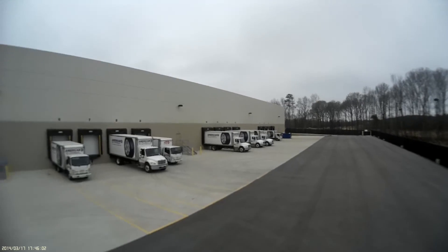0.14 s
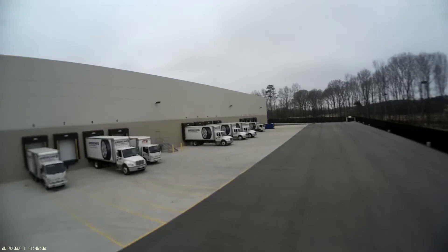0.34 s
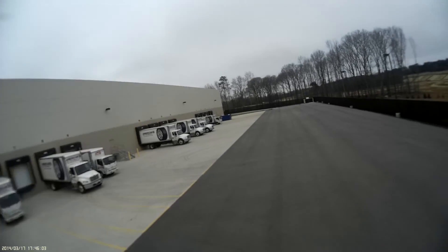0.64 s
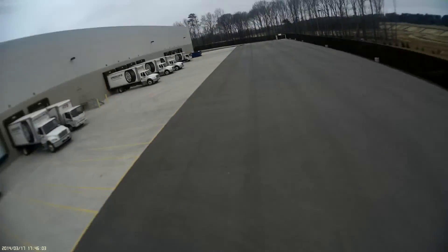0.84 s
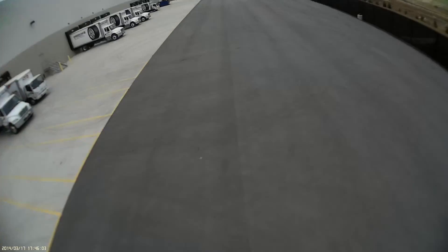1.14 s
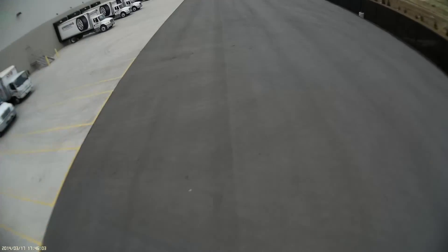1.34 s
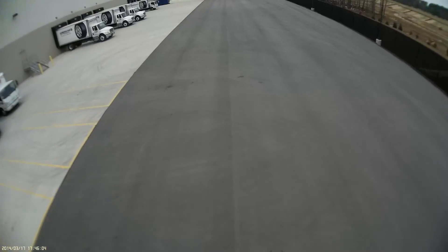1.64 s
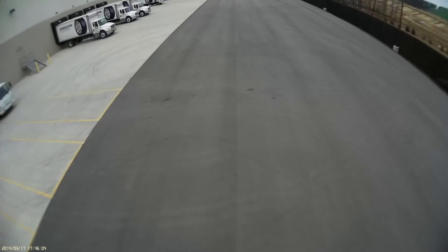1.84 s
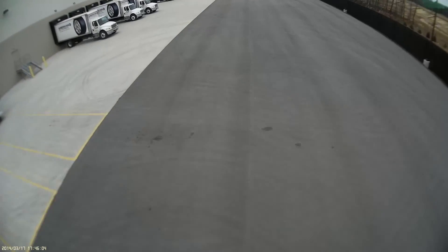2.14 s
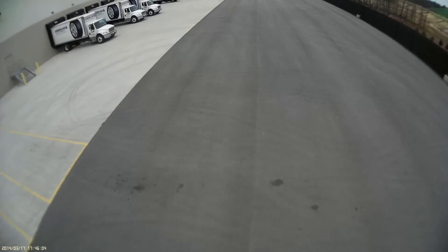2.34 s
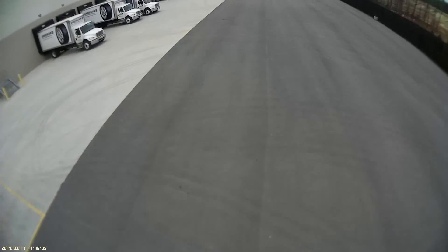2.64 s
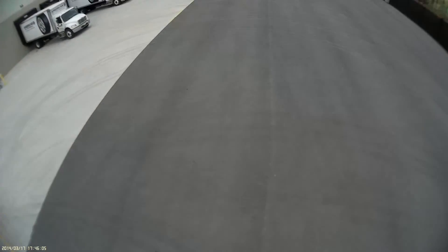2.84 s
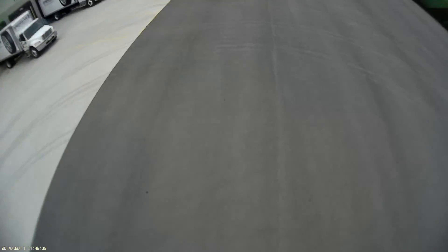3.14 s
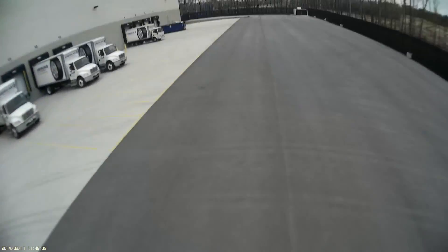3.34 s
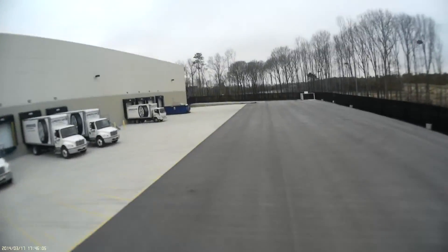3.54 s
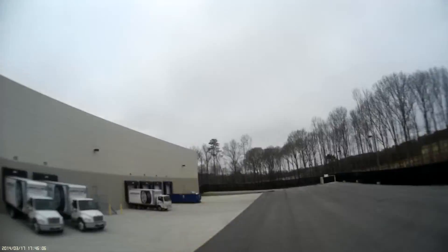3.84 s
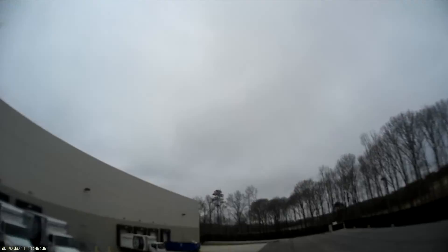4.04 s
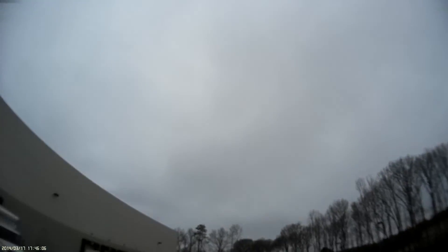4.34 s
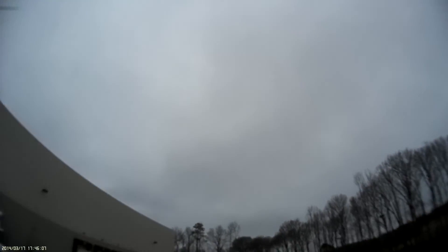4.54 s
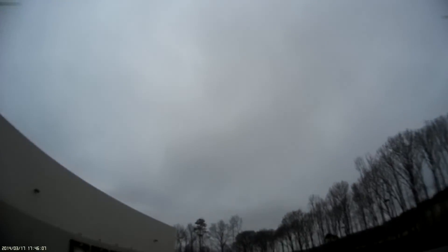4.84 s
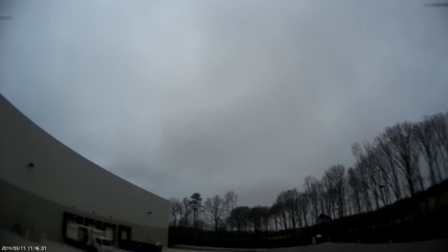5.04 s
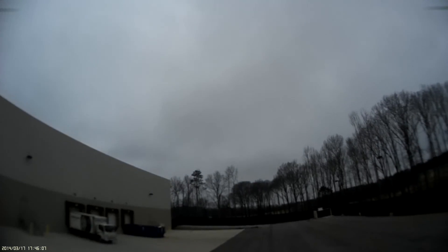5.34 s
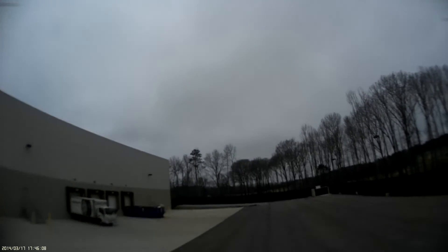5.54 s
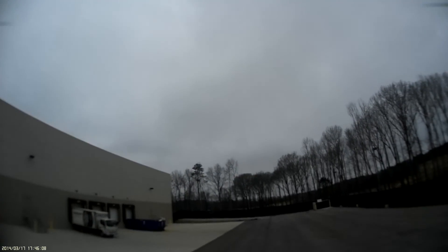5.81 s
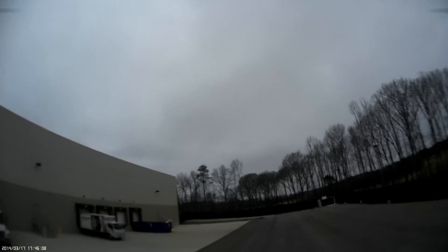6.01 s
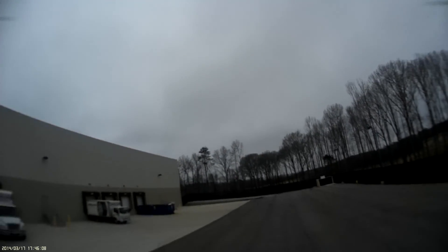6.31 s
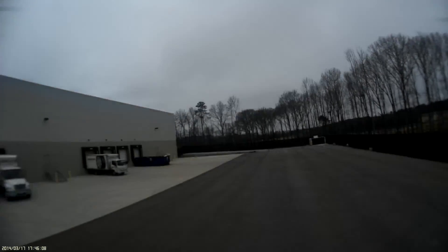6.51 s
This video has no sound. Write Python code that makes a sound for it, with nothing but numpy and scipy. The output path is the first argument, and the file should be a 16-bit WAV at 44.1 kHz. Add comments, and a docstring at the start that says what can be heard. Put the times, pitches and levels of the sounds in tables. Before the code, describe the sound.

Onboard a small drone, a harsh throbbing propeller drone rises, drops suddenly with a rough squawk, then climbs again through roaring wind and hiss.

```python
"""Propellers of a small four-rotor drone in flight, heard by a microphone on its body.
Two near propellers sound harmonic blade tones and beat against each other; a farther one is fainter.
Wind noise buffets and rushes over the port, and blade tip hiss pulses once per blade pass.
Motors whine at high multiples of blade rate, a rough squawk sounds once as the throttle drops,
and the recorder overloads on the peaks."""
import sys
import numpy as np
from scipy import signal
from scipy.io import wavfile

SR = 44100
rng = np.random.default_rng(int(sys.argv[2]) if len(sys.argv) > 2 else 0)


def output_pcm(signal):
    """Save a mono or channel-first signal as 16-bit PCM at the path in sys.argv[1].

    Samples are clipped to [-1, 1] before scaling.
    """
    pcm = np.clip(np.atleast_2d(signal).T, -1, 1) * 32767
    wavfile.write(sys.argv[1], SR, np.round(pcm).astype(np.int16))


N = 294141   # samples


def from_db(db):
    """Amplitude gain is ten to the power of the level in dB over 20."""
    return 10 ** (np.asarray(db) / 20)


def rms_one(x):
    """Dividing a signal by its root mean square gives it unit power."""
    return x / np.sqrt(np.mean(x ** 2) + 1e-20)


def in_time(rows):
    """Linear interpolation turns each table column after the time into a curve over all samples."""
    seconds, *columns = np.transpose(rows)
    t = np.arange(N) / SR
    return [np.interp(t, seconds, column) for column in columns]


def drift(rate):
    """Low-passed noise wanders slowly: spread 1, about `rate` changes a second."""
    step, settling = 20, 2000   # audio samples per slow sample, slow samples discarded
    pole = np.exp(-2 * np.pi * rate * step / SR)
    noise = rng.standard_normal(N // step + settling + 2)
    slow = signal.lfilter([1], [1, -2 * pole, pole * pole], noise)[settling:]
    return np.interp(np.arange(N) / step, np.arange(len(slow)), rms_one(slow))


def swells(events, fall_db_per_s):
    """Exponential rise and decay: a gain that peaks at each event and falls away on both sides."""
    t = np.arange(N) / SR
    levels_db = [peak_db - fall_db_per_s * np.abs(t - s) for s, peak_db in events]
    return from_db(np.max(levels_db, axis=0))


def near_and_far_rates():
    """Beating follows rate differences: blade passes per second of the first, second and far propeller."""
    # Each row: time in seconds, blade rate of the second near propeller in passes per second.
    second_rate = [(0.0, 146.7), (0.22, 161.5), (0.61, 164.8), (0.66, 179), (0.8, 200), (1.0, 236),
                   (1.08, 236), (1.14, 232.9), (1.27, 238.3), (1.42, 242.0), (1.49, 231.4), (1.58, 224.8),
                   (1.65, 230.5), (1.72, 228.6), (1.87, 233), (2.0, 231.5), (2.09, 234.2), (2.3, 226.8),
                   (2.43, 231), (2.56, 228.5), (2.67, 224.0), (2.75, 224.8), (2.87, 242.4), (2.92, 244.0),
                   (3.0, 239), (3.08, 240.5), (3.19, 257.9), (3.28, 253.3), (3.32, 244.4), (3.47, 200.8),
                   (3.58, 211.3), (3.76, 146.4), (3.83, 138.2), (3.91, 140.8), (4.0, 137.7), (4.26, 189.3),
                   (4.31, 189.8), (4.44, 224.7), (4.56, 222.9), (4.71, 234.1), (4.83, 245.8), (4.92, 237.1),
                   (5.02, 248.3), (5.25, 251.6), (5.39, 251.5), (5.42, 247.5), (5.52, 252.8), (6.52, 251.9),
                   (6.67, 256.7)]
    # Each row: time in seconds, second rate minus first rate in passes per second.
    rate_gap = [(0, -48.2), (0.11, -59.2), (0.55, -47.0), (0.6, -40.4), (0.66, -4.9), (0.8, 15.1),
                (1.21, 41.2), (1.37, 41.2), (1.47, 45.1), (2.18, 17.2), (2.42, 15.2), (2.54, 11.0),
                (2.84, 11.5), (2.97, 4.8), (3.49, 28.5), (3.55, 22.1), (3.62, 30.0), (3.73, 23.3),
                (3.88, -0.3), (3.97, 21.5), (4.07, 13.1), (4.2, 11.4), (4.32, 42.7), (4.41, 35.6),
                (4.48, 39.1), (4.58, 39.4), (4.66, 24.0), (4.74, 26.6), (4.79, 18.1), (4.96, 34.5),
                (5.11, 26.7), (5.31, 28.4), (5.4, 33.4), (5.7, 33.4), (5.92, 30.1), (6.06, 17.9),
                (6.09, 16.9), (6.21, 27.0), (6.28, 21.6), (6.67, 15.6)]
    # Each row: time in seconds, blade rate of the farther propeller in passes per second.
    far_rate = [(.82, 209.5), (.88, 218.6), (1.02, 223), (1.21, 215.2), (1.39, 214.8), (1.5, 212.3),
                (1.75, 220), (1.84, 229.2), (2.02, 236.5), (2.11, 242), (2.27, 242), (2.38, 247),
                (2.74, 248.5), (2.83, 257.2), (2.91, 259.6), (3.02, 252.8), (3.19, 255.8), (3.3, 253),
                (3.4, 231), (3.48, 221.4), (3.57, 228.6), (3.67, 214.3), (4.22, 211.9), (4.28, 228.6),
                (4.33, 238.1), (4.45, 244.5), (4.9, 252.4), (5.05, 251.5), (5.2, 239), (5.32, 234.8),
                (5.42, 237.2), (5.56, 225.2), (5.72, 231.8), (5.96, 232.4), (6.08, 222.5), (6.2, 228.6)]
    (rate_2,), (gap,), (rate_3,) = in_time(second_rate), in_time(rate_gap), in_time(far_rate)
    return rate_2 - gap, rate_2, rate_3


def propeller(turn, level_db, tilt_db, sharp_db, uneven_db):
    """Periodic blade pressure pulses form a harmonic series, a little unsteady in the churned air."""
    # Unequal blades add the half multiples.
    # Each row: multiple of blade rate, level in dB relative to the blade-rate tone.
    blade_series = [(.5, -16), (1, 0), (1.5, -26), (2, -10.3), (2.5, -26), (3, -18.5), (4, -30), (5, -34),
                    (6, -37), (7, -40), (8, -42), (9, -45)]
    skew = .78   # radians each multiple lags the one below: slow rise, quick fall
    tones = 0
    for k, db in blade_series:
        if k % 1:
            shape_db = uneven_db
        else:
            shape_db = tilt_db * np.log2(min(k, 4)) + sharp_db * np.log2(max(k / 3, 1))
        # the blade-rate tone itself stays steady
        flicker_db = (k != 1) * 1.3 * drift(10.6)
        tones = tones + from_db(db + shape_db + flicker_db) * np.cos(k * turn - skew * (k - 1))
    return from_db(level_db) * tones


def propellers(turns):
    """Superposition of three harmonic series at different blade rates gives the beating drone."""
    # Each row: time in seconds, peak level of the blade-rate tone in dB, first then second propeller.
    tone_levels = [(0, -5, -12.4), (.22, -3.9, -11.8), (.57, -4.6, -11.8), (.72, -5.3, -12.5),
                   (.8, -7.3, -9), (1, -7, -8.6), (1.2, -9, -9.4), (1.4, -9, -9.4), (1.56, -10.6, -10.4),
                   (1.94, -8.4, -11), (2.2, -8.2, -11.3), (2.4, -9.4, -11.3), (2.8, -10.3, -12.5),
                   (3.1, -10.2, -12.7), (3.42, -10.2, -10.6), (3.57, -8.5, -8.6), (3.8, -14.2, -13.8),
                   (4, -14.8, -11.5), (4.12, -9, -11), (4.4, -7.8, -4.9), (4.73, -4.5, -7.2),
                   (4.89, -7.6, -4.5), (5.09, -6.4, -6.2), (5.3, -6.5, -8), (5.9, -6.2, -8.5),
                   (6.1, -5.9, -8.8), (6.4, -5.4, -7.1), (6.67, -4.9, -6.8)]
    # Load on the near blades. Each row: time in seconds, sharpness of the first in dB per octave above
    # the third multiple, lift of the half multiples of the first in dB, of the second in dB.
    blade_load = [(0, 7, -12, -4), (.58, 9, -9, -4), (.65, 11, -5, -2), (.8, 10, -7, -1), (.95, 4, -12, 0),
                  (1.2, 0, -12.5, -1), (3.2, 0, -11, -1), (3.8, 0, -14, -4), (4.1, 1, -15, -5),
                  (4.7, 1, -8.5, -3), (5.1, -1, 3, 1), (5.9, -1, -3, -1), (6.67, 0, -7, 0)]
    # Overtone strength up to the fourth multiple.
    # Each row: time in seconds, tilt of the first in dB per octave, of the second in dB per octave.
    overtone_tilt = [(0, -0.5, 1.5), (.6, 1.5, -0.5), (1.6, 2, -1), (2.2, 2, 0), (3.6, 2.5, 1.5),
                     (3.9, 2.5, -0.5), (4.7, -0.5, 0.5), (5.3, -2, -1), (6, -3.5, -2), (6.67, 0.5, -1.5)]
    db_1, db_2 = in_time(tone_levels)
    sharp_db, uneven_1_db, uneven_2_db = in_time(blade_load)
    tilt_1_db, tilt_2_db = in_time(overtone_tilt)
    first = propeller(turns[0], db_1, tilt_1_db, sharp_db, uneven_1_db)
    second = propeller(turns[1], db_2, tilt_2_db, 0, uneven_2_db)
    far = propeller(turns[2], -33, 0, 0, uneven_2_db)
    return first + second + far


def turbulence(spectrum, band_hz, shared_db, own_db, rate):
    """Turbulence is broadband noise: half-octave bands surge together and flicker alone; rms 1 in band_hz."""
    hz, db = np.transpose(spectrum)
    edges = 18 * 2 ** np.arange(0, 10.1, .5)   # Hz
    surge = drift(rate)
    white = rng.standard_normal((2, N))   # neighbouring bands draw on different noise
    out = 0
    for k, (low, high) in enumerate(zip(edges, edges[1:])):
        band_pass = signal.butter(2, [low, high], "band", fs=SR, output="sos")
        band = signal.sosfilt(band_pass, white[k % 2])
        log_centre = np.log(low * high) / 2
        level_db = np.interp(log_centre, np.log(hz), db, right=-200)   # silent above the last row
        out = out + band * from_db(level_db + shared_db * surge + own_db * drift(rate / 2))
    reference = signal.butter(4, band_hz, "band", fs=SR, output="sos")
    return out / np.std(signal.sosfilt(reference, out))


def wind_buffet(rush_db):
    """Large eddies press on the port: low noise that follows part of the gust swing, plus heavy blows."""
    # Each row: frequency in Hz, relative density in dB per Hz.
    buffet_spectrum = [(20, 2.5), (40, -1.5), (70, -3.5), (120, -3), (250, -34), (600, -1.5)]
    # Each row: time of a blow in seconds, peak level in dB.
    heavy_blows = [(.07, -15), (.2, -20), (.35, -25), (.55, -25), (.8, -38), (3.75, -25), (4, -22),
                   (4.09, -21), (4.3, -33), (4.6, -18), (4.68, -18), (4.77, -10), (4.89, -5), (5.87, -27),
                   (6.3, -25), (6.37, -25), (6.56, -26), (6.63, -14.5)]
    calm_db, calm_rush_db, share = -47, -40.5, .57   # buffet and rush at calm; share of the gust swing
    steady_gain = from_db(calm_db + share * (rush_db - calm_rush_db))
    gain = steady_gain + swells(heavy_blows, fall_db_per_s=280)
    return gain * turbulence(buffet_spectrum, [20, 85], shared_db=2.5, own_db=1.5, rate=14.0)


def gust_rush(rush_db, turns):
    """Turbulent flow over the port rushes, amplitude-modulated as each near blade sweeps by."""
    # Each row: frequency in Hz, relative density in dB per Hz.
    rush_spectrum = [(60, 3), (150, 2), (400, 2.5), (800, -3), (1200, -2), (1600, 1.5), (1900, -11.5),
                     (2300, -16), (4500, -14.5), (8000, -20), (16000, -30.5)]
    # Each row: time in seconds, chopping depth of the first near propeller in dB, of the second in dB.
    wake_depth = [(0, 4.5, 2), (.8, 4, 2), (1.1, 2, 1.5), (3.2, 1.2, 1), (4.3, 1.2, 2), (5.9, 1, 1.2),
                  (6.2, 3, 4.5), (6.67, 3, 4.5)]
    # loudest a quarter cycle after the crest of the blade-rate tone
    wake_db = sum(depth * np.sin(turn) for depth, turn in zip(in_time(wake_depth), turns))
    rush = turbulence(rush_spectrum, [900, 2600], shared_db=1.0, own_db=0.5, rate=28.0)
    return from_db(rush_db + wake_db) * rush


def tip_hiss(turns):
    """Fine turbulence at the blade tips hisses, amplitude-modulated once per pass of each near blade."""
    # Each row: frequency in Hz, relative density in dB per Hz.
    hiss_spectrum = [(100, -5.5), (250, 5), (600, 0), (1200, -14), (2500, -28), (5000, -23), (9000, -21.5),
                     (16000, -16)]
    # Each row: time in seconds, hiss level in dB.
    hiss_levels = [(0, -39), (.3, -42.5), (.8, -45), (1, -38), (2.84, -36.5), (3.1, -41), (3.6, -45),
                   (3.85, -51), (4.1, -44), (4.3, -40), (4.9, -37), (5.05, -36), (5.8, -40.5), (6.1, -44),
                   (6.25, -40), (6.45, -50), (6.67, -40)]
    # Brief flares in the gusts. Each row: time in seconds, peak level in dB.
    hiss_flares = [(3.3, -32.5), (3.57, -41), (4.45, -32.5), (4.68, -38), (4.81, -32), (6.39, -37),
                   (6.52, -34), (6.58, -41), (6.63, -27.5)]
    (hiss_db,) = in_time(hiss_levels)
    gain = from_db(hiss_db) + swells(hiss_flares, fall_db_per_s=348)
    pass_db = 1.5 * (np.cos(turns[0] + .8) + np.cos(turns[1] + .3))
    hiss = turbulence(hiss_spectrum, [7600, 14000], shared_db=1.0, own_db=1.7, rate=40.0)
    return gain * from_db(pass_db) * hiss


def air(turns):
    """Superposed eddy sizes: low buffeting, mid gust rush and high tip hiss."""
    # Wind over the port. Each row: time in seconds, gust rush level in dB.
    gust_levels = [(0, -24.5), (.07, -22.5), (.55, -24.5), (.86, -27), (1, -34), (1.2, -44), (1.45, -40),
                   (2.04, -36), (2.25, -34), (3.1, -30.5), (3.4, -27.5), (3.58, -23.5), (3.75, -31),
                   (4, -33.5), (4.09, -29), (4.42, -21.5), (4.53, -22.5), (4.7, -19.5), (4.89, -16),
                   (5.02, -27), (5.33, -35.5), (5.87, -30), (5.95, -32), (6.06, -22.5), (6.1, -26.5),
                   (6.2, -28.5), (6.35, -18.5), (6.42, -20.5), (6.52, -19), (6.67, -18)]
    (rush_db,) = in_time(gust_levels)
    return wind_buffet(rush_db) + gust_rush(rush_db, turns) + tip_hiss(turns)


def capsule(x):
    """A capsule's response rolls off at the top: a second-order low-pass."""
    return signal.sosfilt(signal.butter(2, 9600, fs=SR, output="sos"), x)


def housing(x):
    """Cavity resonance: each mode of the microphone housing adds a broad peak."""
    # Each row: frequency in Hz, width in Hz, lift in dB.
    cavity_modes = [(3700, 450, 5), (4900, 600, 5), (7100, 600, 3), (9750, 800, 4), (11900, 700, 4),
                    (13500, 700, 2)]
    out = x
    for hz, width, lift_db in cavity_modes:
        radius = np.exp(-np.pi * width / SR)
        edge = (1 - radius ** 2) / 2
        poles = [1, -2 * radius * np.cos(2 * np.pi * hz / SR), radius ** 2]
        peak = signal.lfilter([edge, 0, -edge], poles, x)
        out = out + (from_db(lift_db) - 1) * peak
    return out


def motors(turns):
    """Magnetic forces lock motor whine to rotation: thin lines at high multiples, wavering slightly."""
    # Each row: propeller 0 to 2, multiple of blade rate, start in seconds, end in seconds, peak in dB.
    whine_lines = [(0, 21, 1.85, 2.75, -51), (0, 21, 2.8, 3.25, -43), (0, 28, 2.85, 3.32, -43),
                   (0, 21, 5.3, 5.8, -51), (1, 21, 1.05, 1.5, -46), (1, 21, 1.95, 2.75, -49),
                   (1, 21, 2.8, 3.15, -45), (1, 21, 5.02, 6.3, -43.5), (1, 22.5, 1, 1.75, -45),
                   (1, 26, .95, 3.08, -40), (1, 28, .95, 1.95, -44), (1, 28, 2.1, 3.08, -42.5),
                   (1, 28, 4.98, 6.35, -46), (1, 42, .95, 3.16, -47), (1, 42, 4.94, 6.4, -48),
                   (2, 21, .85, 3.27, -38.5), (2, 21, 3.36, 3.67, -38), (2, 21, 4.24, 4.33, -37),
                   (2, 21, 5.15, 6.3, -36.5), (2, 28, 2, 3.1, -42), (2, 28, 4.25, 4.5, -44),
                   (2, 28, 5.05, 5.95, -47), (2, 42, .95, 1.75, -51), (2, 42, 5.25, 5.95, -50)]
    fade_db_per_s, wobble = 150, .45   # wobble in radians
    t, out = np.arange(N) / SR, 0
    for which, k, start, end, db in whine_lines:
        time_outside = np.maximum(np.maximum(start - t, t - end), 0)
        line_db = db - fade_db_per_s * time_outside + .93 * drift(8.8)
        phase = k * turns[which] + wobble * drift(25.0)
        out = out + from_db(line_db) * np.sin(phase)
    return out


def squawk():
    """Random phase and amplitude modulation roughen a brief tone as the throttle drops."""
    # Each row: time in seconds, pitch in Hz, level in dB.
    squawk_path = [(3.21, 2320, -70), (3.24, 2280, -29), (3.27, 2200, -33), (3.36, 2180, -31),
                   (3.39, 2120, -66)]
    hz, db = in_time(squawk_path)
    phase = 2 * np.pi * np.cumsum(hz) / SR + 1.2 * drift(50.0)
    return from_db(db + 1.5 * drift(60.0)) * np.sin(phase)


def scene():
    """Sound pressures superpose: propellers, air, motors and squawk at one microphone."""
    # phase advances by 2 pi per blade pass
    turns = [2 * np.pi * np.cumsum(rate) / SR for rate in near_and_far_rates()]
    wind = housing(capsule(air(turns)))
    return (propellers(turns) + wind + motors(turns) + squawk())[None]


def record(dry):
    """Saturation: the input overloads with nearly flat tops, then a low-pass cuts the top of the band."""
    ceiling, hardness, cutoff_hz = .71, 14.0, 15650
    clipped = dry / (1.0 + np.abs(dry / ceiling) ** hardness) ** (1 / hardness)
    cut = signal.ellip(12, .3, 60, cutoff_hz, fs=SR, output="sos")
    settled = signal.sosfilt_zi(cut)[:, None] * clipped[:, :1]   # the filter is already running
    return signal.sosfilt(cut, clipped, zi=settled)[0]


dry = scene()
out = record(dry)
output_pcm(out)
```